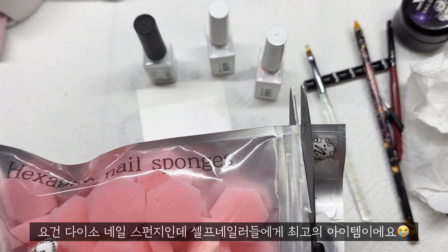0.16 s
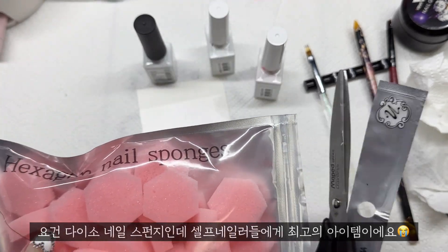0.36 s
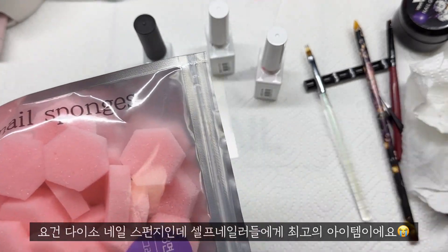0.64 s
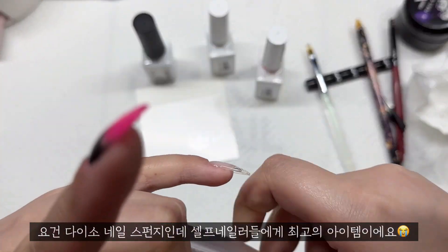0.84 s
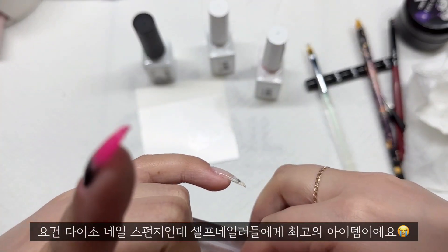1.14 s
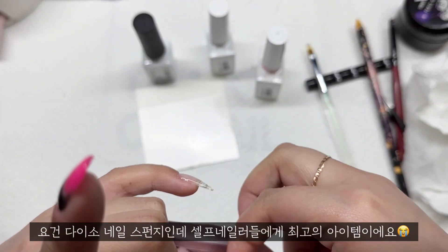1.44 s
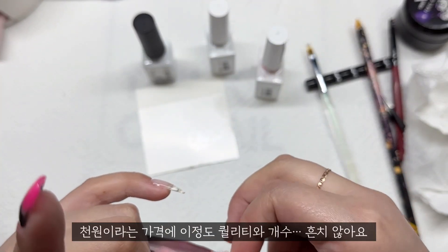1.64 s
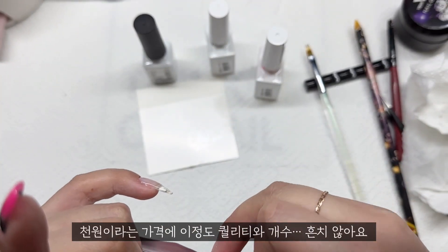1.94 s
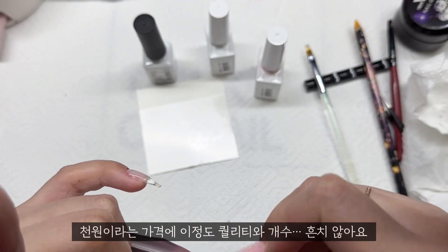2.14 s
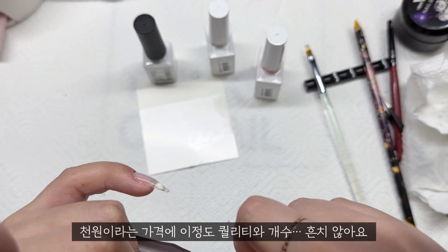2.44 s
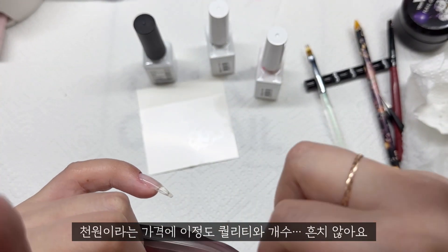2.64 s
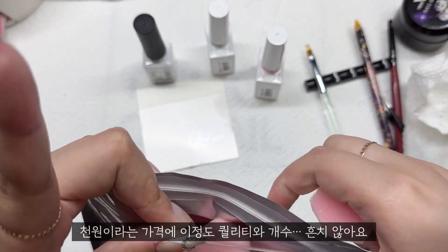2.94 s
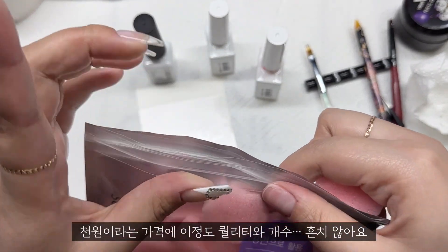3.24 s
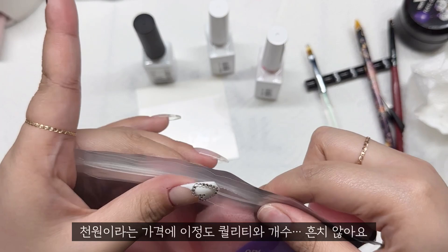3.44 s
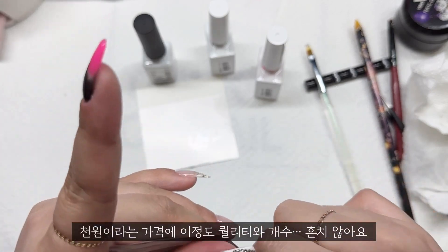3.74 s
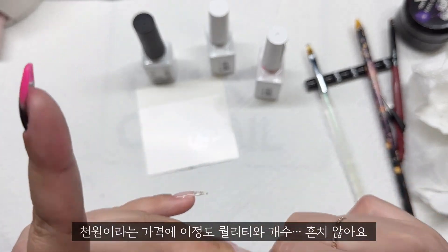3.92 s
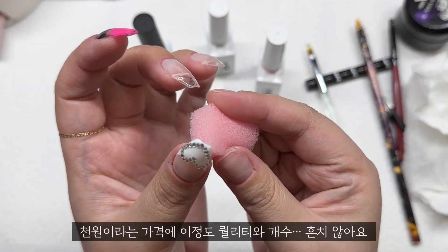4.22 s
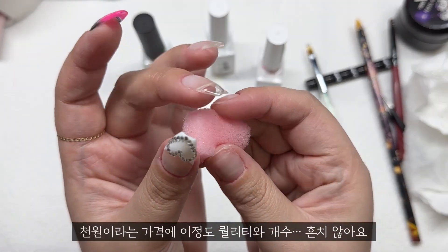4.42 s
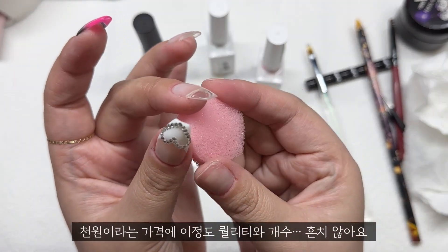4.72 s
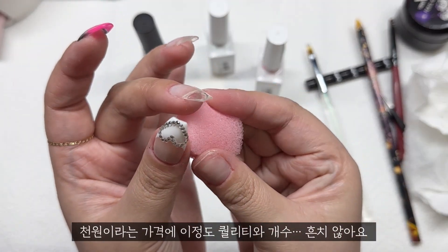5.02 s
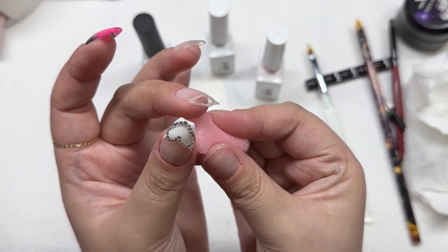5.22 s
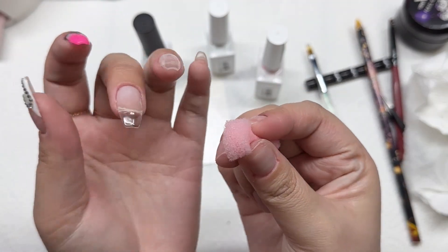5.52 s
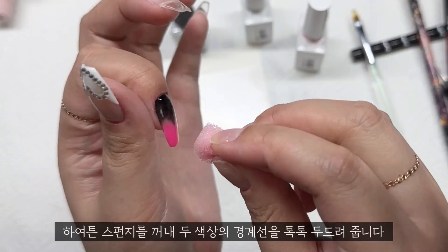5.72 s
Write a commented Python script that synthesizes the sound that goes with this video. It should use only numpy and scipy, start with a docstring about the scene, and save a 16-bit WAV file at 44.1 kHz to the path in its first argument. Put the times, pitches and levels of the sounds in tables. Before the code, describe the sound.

Close, crisp plastic packet: a quick metallic cut, rustling and hard buckling snaps, then sudden quiet with faint sponge fizz over hiss.

```python
"""Scissors snip the top off a plastic pouch of foam sponges, close up in a small quiet room: noise bursts, ringing.
Hands pull the pouch open and dig in it: film slides (friction grains), crackles, flops and buckles in sharp snaps.
The rustle stops dead; fingers faintly squeeze one sponge (fine grains) over microphone hiss (coloured noise)."""
import sys
import numpy as np
from scipy import signal
from scipy.fft import rfft, irfft, next_fast_len
from scipy.io import wavfile
from scipy.ndimage import uniform_filter1d

SR = 44100
rng = np.random.default_rng(int(sys.argv[2]) if len(sys.argv) > 2 else 0)


def put_to_file(sound):
    """Save the sound as 16-bit audio at rate SR, in the file named by the first command-line argument."""
    columns = np.atleast_2d(sound).T  # one column per channel
    safe = np.clip(columns, -1, 1)
    whole_steps = np.round(safe * 32767)
    wavfile.write(sys.argv[1], SR, whole_steps.astype(np.int16))


N = 258847
TIME = np.arange(N) / SR
GRIP_FROM_S = .56  # once picked up, the pouch never lies quite still
ARCH_DB = 2.5  # a movement presses hardest at its middle

# Spectrum of film rubbing at the contact. Each row: frequency in Hz, relative density in dB per Hz.
CONTACT_SPECTRUM = [(1200, -35.5), (2500, 0.5), (3200, 0.5), (4200, 2.5), (5000, -0.5), (7000, -0.5),
                    (8800, -1), (9800, -10), (11000, -23), (13000, -13.5), (16000, -16.5)]


def amp(db):
    """Decibels to gain."""
    return 10 ** (np.asarray(db) / 20)


def unit(x):
    """Scales to rms 1."""
    return x / np.sqrt(np.mean(x ** 2) + 1e-20)


def read(points, hz):
    """Reads a spectrum on a log-frequency axis."""
    f, value = np.transpose(points)
    return np.interp(np.log(hz + 1), np.log(f + 1), value)


def add(mix, s, sound):
    """Mixes a sound in at s seconds."""
    part = mix[max(round(s * SR), 0):][:len(sound)]
    part += sound[:len(part)]


def colour(x, spectrum, size=4096):
    """Causal minimum-phase filter with the given spectrum, so that clicks keep their sharp front."""
    hz = abs(np.fft.fftfreq(size, 1 / SR))
    log_gain = np.log(amp(read(spectrum, hz)))
    response = np.exp(np.conj(signal.hilbert(log_gain)))
    taps = np.fft.ifft(response).real[:size // 2]
    return signal.oaconvolve(x, taps)[:len(x)]


def band(x, lo_hz, hi_hz, order=2):
    """Band-pass."""
    edges_hz = [lo_hz, min(hi_hz, .49 * SR)]
    return signal.sosfilt(signal.butter(order, edges_hz, "band", fs=SR, output="sos"), x)


def resonate(x, hz, width_hz):
    """One resonance: a decaying complex pole."""
    r = np.exp(-np.pi * width_hz / SR)
    pole = r * np.exp(2j * np.pi * hz / SR)
    return 2 * signal.lfilter([1 - r], [1, -pole], x).real


def grains(per_s, spread_db, smooth, clump_db):
    """Tiny stick-slip releases of uneven size, coming in clumps, over smooth friction."""
    hits = rng.random(N) < per_s / SR
    signs = rng.choice([-1, 1], N)
    sizes = amp(spread_db * np.minimum(rng.exponential(1, N), 3.5))
    friction = unit(hits * signs * sizes) + smooth * rng.standard_normal(N)
    clumps = unit(uniform_filter1d(rng.standard_normal(N), size=220))  # 5 ms average
    return unit(friction * amp(clump_db * clumps))


def gesture(start_s, length_s, attack_s, release_s):
    """Envelope of one movement: it swells up to its start, arches over its length, and dies away."""
    early = np.maximum(start_s - TIME, 0) / attack_s
    late = np.maximum(TIME - start_s - length_s, 0) / release_s
    progress = np.clip((TIME - start_s) / (length_s + 1e-9), 0, 1)
    arch = 4 * progress * (1 - progress) - .5
    return np.exp(-early - late) * amp(ARCH_DB * arch)


def gestures(rows, attack_s, release_s):
    """Gain over time of movements (start in s, length in s, level in dB); their powers add."""
    power = np.zeros(N)
    for start_s, length_s, db in rows:
        power += (amp(db) * gesture(start_s, length_s, attack_s, release_s)) ** 2
    return np.sqrt(power)


def ticks(rows, decay_s):
    """Tiny dry noise ticks with no ring, from rows of time in s and level in dB."""
    out, t = np.zeros(N), np.arange(SR // 200) / SR
    for s, db in rows:
        add(out, s, amp(db) * unit(rng.standard_normal(len(t)) * np.exp(-t / decay_s)))
    return out


def background():
    """Microphone hiss and low room rumble, with a thin, fluttering electrical whine."""
    # Each row: frequency in Hz, relative density in dB per Hz.
    hiss_spectrum = [(25, -31), (45, -3.5), (70, 18.5), (100, 11.5), (300, 5.5), (1100, -3.5), (2000, 1),
                     (2900, -2), (4300, 3.5), (5200, -5), (7700, 3.5), (9000, -4), (11200, -30.5),
                     (16000, -17)]
    hiss = amp(-66.5) * unit(colour(rng.standard_normal(N), hiss_spectrum))
    flutter = 1 + .8 * np.cos(2 * np.pi * 60 * TIME)
    whine = amp(-75.5) * unit(band(rng.standard_normal(N), 5900, 5990) * flutter)
    return hiss + whine


def sliding():
    """Dense friction grains fizz at the contact; sparser slips and crinkles shake wider panels and crackle."""
    # Strokes of the film over blades, skin and itself.
    # Each row: start in seconds, length in seconds, panel rustle in relative dB, contact fizz in relative dB.
    strokes = np.array([(0.005, 0.01, -40.5, -49), (0.128, .02, -53, -63), (0.176, 0.0063, -35, -30.5),
                        (0.207, 0.023, -30, -29), (0.267, 0.05, -51.5, -48.5), (0.333, 0.28, -73, -67),
                        (0.597, 0.086, -85, -61), (0.65, 0.11, -70.5, -51.5), (0.789, 0.054, -44.5, -40.5),
                        (0.992, 0.066, -48, -41.5), (1.035, 0.048, -44.5, -35), (1.154, 0.058, -55.5, -45),
                        (1.23, 0.069, -52.5, -49.5), (1.38, 0.074, -55.5, -48), (1.49, 0.028, -52, -42.5),
                        (1.621, 0.033, -49.5, -41.5), (1.76, 0.01, -51.5, -62), (1.858, 0.0082, -48.5, -42),
                        (1.949, 0.08, -57.5, -45.5), (2.076, 0.066, -64, -55), (2.148, .02, -40.5, -66),
                        (2.365, 0.15, -62.5, -54.5), (2.517, 0.057, -45, -44), (2.59, 0.073, -52, -56),
                        (2.687, 0.0096, -41, -32.5), (2.708, 0.046, -55.5, -40),
                        (2.89, 0.031, -53.5, -45.5), (3.03, .018, -47, -69), (3.1, 0.064, -51, -39.5),
                        (3.17, 0.0062, -36, -32.5), (3.32, 0.075, -57.5, -59), (3.44, 0.013, -37.5, -40.5),
                        (3.484, 0.11, -46.5, -40.5), (3.67, 0.13, -52, -53.5), (3.781, 0.04, -41, -41),
                        (3.886, 0.056, -46.5, -36.5), (3.949, 0.005, -30, -29.5),
                        (3.995, 0.027, -38.5, -43)])
    # Resonances of the wider panels. Each row: frequency in Hz, width in Hz, linear gain.
    panel_modes = [(490, 160, 1.0), (1030, 92, 1), (1470, 340, 1.0)]
    # Spectrum of the shaking panels. Each row: frequency in Hz, relative density in dB per Hz.
    panel_spectrum = [(150, -9.5), (350, -5), (600, 1.5), (1000, -1), (1700, 3), (2800, -5.5),
                      (4000, -18.5), (8000, -43)]
    attack_s, release_s = .011, .012  # the film takes hold, and comes to rest
    grip_rustle_db, grip_fizz_db = -64, -59  # relative, as the strokes
    crinkle_share = .74  # single creases giving way amid the rustle

    held = TIME > GRIP_FROM_S
    flexing = np.hypot(gestures(strokes[:, [0, 1, 2]], attack_s, release_s), amp(grip_rustle_db) * held)
    contact = np.hypot(gestures(strokes[:, [0, 1, 3]], attack_s, release_s), amp(grip_fizz_db) * held)

    slips = grains(per_s=3500, spread_db=3.6, smooth=.7, clump_db=1.1)
    sparse = grains(per_s=700, spread_db=4, smooth=.45, clump_db=1.2)
    crinkles = crinkle_share * grains(per_s=110, spread_db=3, smooth=0, clump_db=0)
    kicks = slips + sparse + crinkles
    shaking = kicks + sum(gain * resonate(kicks, hz, width_hz) for hz, width_hz, gain in panel_modes)

    rustle = unit(colour(shaking, panel_spectrum)) * flexing
    fizz = unit(colour(slips, CONTACT_SPECTRUM)) * contact
    # The power above 1 makes the treble crackle grow faster than the level.
    crackle = unit(band(sparse + crinkles, 3000, 16000, order=1)) * contact ** 1.5
    return amp(-2.0) * rustle + amp(-5.5) * fizz + amp(0.5) * crackle


def snap(db, bass_db, treble_db, decay_s, ring_hz, ring_db, size=3072):
    """A sheet is jolted: bending waves arrive treble first, die treble first, and ring at a pitch."""
    # Spectrum of the film. Each row: frequency in Hz, relative density in dB per Hz.
    film_spectrum = [(40, -31.5), (100, -11.5), (250, -8), (500, -4.5), (1000, -4), (2000, 1), (3800, -2.5),
                     (5000, -6), (7500, -7), (9200, -13), (11000, -27), (16000, -25.5)]
    t = np.arange(size) / SR
    edges_hz = np.geomspace(70, 18000, 13)
    burst = np.zeros(size)
    for lo, hi in zip(edges_hz, edges_hz[1:]):
        slowness = 1500 / np.sqrt(lo * hi)
        rise = 1 - np.exp(-t / (0.00044 * slowness ** .6))
        fall = np.exp(-t / (1.2 * decay_s * slowness ** 0.083))
        burst += unit(band(rng.standard_normal(size) * rise * fall, lo, hi)) * np.sqrt(hi - lo)
    burst = unit(colour(burst, film_spectrum))
    burst = colour(burst, [(50, 0.5), (300, bass_db), (1000, 2.5), (3000, -1), (6500, treble_db)])

    ring = unit(resonate(burst, ring_hz, width_hz=120 + .1 * ring_hz))
    after_ring = unit(resonate(burst, ring_hz, width_hz=10 + 0.012 * ring_hz))
    burst += amp(ring_db) * (ring + amp(-12) * after_ring)
    # The level is that of the 700-5000 Hz energy spread over 3 ms.
    power = np.sum(band(burst, 700, 5000) ** 2) / (.003 * SR)
    return amp(db) * burst / np.sqrt(power)


def snips():
    """Blades bite through the film and clack shut; the scissors ring at the same pitch at every bite."""
    # Each row: time in seconds, level in dB, bass in dB, treble in dB, nominal decay in seconds, ring in dB.
    bites = [(0.0069, -40, 4.5, 0, 0.003, -16), (0.0142, -28, 10, 0, 0.0024, -5),
             (0.0386, -27, 3.5, -1.5, 0.004, -1.5), (0.0653, -31, 5, -16.5, 0.0015, -2.5),
             (0.0908, -41, 2.5, 14, .0013, -9.5), (0.1085, -37.5, 10.5, 9.5, .006, -10),
             (0.1384, -19, -9, -15, .0035, -7), (0.1608, -41.5, 3, 3.5, 0.0023, -8),
             (0.1632, -31, 11.5, -11.5, .0025, -13), (0.235, -8, -2, 0.5, 0.0018, -24.5),
             (0.2406, -17, 12.5, 3, .0024, -6), (0.2561, -20, -7.5, -11.5, .0015, -18.5)]
    blade_ring_hz = 1036
    out = np.zeros(N)
    for s, *shape, ring_db in bites:
        add(out, s, snap(*shape, blade_ring_hz, ring_db))
    return out


def handling():
    """Dull, low push of the hands on the pouch: noise with a soft low resonance."""
    # Shoves of the pouch. Each row: time in seconds, level in relative dB, release in seconds.
    shoves = [(0.045, -44, 0.027), (0.254, -28.5, 0.011), (0.965, -51, .04), (1.18, -52, 0.079),
              (1.78, -55.5, 0.057), (2.14, -52, .06), (2.53, -54, 0.087), (2.66, -50, 0.022),
              (3.155, -42.5, .022), (3.245, -55.5, 0.06), (3.545, -45, .02), (3.63, -39.5, .026),
              (3.765, -42, .055), (3.945, -40, 0.029), (4.0, -39.5, 0.0397)]
    # Each row: frequency in Hz, relative density in dB per Hz.
    hand_spectrum = [(25, -34), (45, -15), (70, 0.5), (140, -2), (200, -7.5), (330, -8.5), (600, -31),
                     (2000, -57)]
    resting_db, rise_s = -72, .022  # resting level relative, as the shoves
    push = rng.standard_normal(N)
    force = amp(resting_db) * (TIME > GRIP_FROM_S)
    for s, db, release_s in shoves:
        force = np.hypot(force, amp(db) * gesture(s, 0, rise_s, release_s))
    thud = unit(colour(push + 1.2 * resonate(push, 140, width_hz=18), hand_spectrum))
    return amp(-0.5) * force * thud


def creases():
    """Tiny creases tick in the film."""
    # Each row: time in seconds, level in relative dB.
    crease_ticks = [(0.114, -56), (0.126, -52), (0.4152, -55.5), (1.0809, -44.5), (2.456, -49.5),
                    (2.5757, -43), (2.787, -52), (3.2195, -44.5), (3.3334, -41), (3.385, -50),
                    (3.3996, -49.5), (3.5622, -46), (3.581, -40), (3.829, -45.5)]
    return amp(6.5) * colour(ticks(crease_ticks, decay_s=.0007), CONTACT_SPECTRUM)


def thumps():
    """Soft low thumps, the first from the scissors closing: each tone swells and dies within a few cycles."""
    # Each row: time in seconds, envelope peak in dB, pitch in Hz, decay in seconds.
    low_thumps = [(0.248, -34.5, 75, .012), (0.746, -49, 62, 0.014), (1.755, -44.5, 146, 0.023),
                  (3.945, -37.5, 105, 0.012), (4.55, -57, 72, 0.028)]
    out, t = np.zeros(N), np.arange(SR // 2) / SR
    for s, db, hz, decay_s in low_thumps:
        envelope = t / decay_s * np.exp(1 - t / decay_s)
        add(out, s, amp(db) * envelope * np.sin(2 * np.pi * hz * t))
    return out


def pops():
    """A bulging panel pops hollowly, each time with a pitch of its own."""
    # Each row: time in seconds, level in dB, treble in dB, nominal decay in seconds, ring in Hz, ring in dB.
    bulges = [(0.3837, -48.5, -4, .005, 988, 2), (0.749, -36.5, -24, 0.0044, 1540, 6.5),
              (1.2321, -23.5, 0.5, 0.0024, 1360, 9), (1.3487, -28.5, -30, 0.003, 587, -5.5),
              (2.0035, -35.5, -20.5, .009, 1440, 8), (2.5948, -24, -10, 0.0036, 1486, -5),
              (3.0555, -34, 13, .0017, 1090, 7), (3.239, -23, -9, 0.0023, 1020, 22),
              (3.6468, -23.5, -9, 0.0017, 1940, 27), (3.7067, -39.5, -15, 0.0028, 1294, 1)]
    bass_db = 4.5
    out = np.zeros(N)
    for s, db, *shape in bulges:
        add(out, s, snap(db, bass_db, *shape))
    return out


def panel_snaps():
    """Taut panels buckle; a brighter snap comes from a smaller panel and rings higher, faintly."""
    # Each row: time in seconds, level in dB, bass in dB, treble in dB, nominal decay in seconds.
    buckles = [(0.551, -43.5, -6, 9, .0028), (0.6981, -37.5, -11.5, 8, .0096),
               (0.9339, -22, -11, -4, .0017), (0.9381, -21.5, -4.5, -14, .0012),
               (0.9509, -8.5, -15, 3.5, 0.0016), (1.0361, -24, -3, 1, .0087),
               (1.0495, -33.5, -1, 25, .0013), (1.109, -36, 2, 1.5, .01), (1.388, -42.5, -16, 6, .0033),
               (1.6368, -28, -29, -40, .003), (1.748, -39.5, 11, 7.5, .0021), (2.0281, -37, 5, 8.5, .0069),
               (2.0504, -38.5, 13, 6.5, .0036), (2.1318, -12, -3, -1, 0.00062),
               (2.1371, -19, 0, -25, .0007), (2.5015, -30, 8, -1.5, .008), (2.6235, -27, -23, -1, .0037),
               (2.6258, -25, -12, 10, .0056), (2.8902, -39.5, 11, -11, .0026), (2.9594, -33, -13, 4, .0071),
               (2.9622, -30, -13, -0.5, .0083), (3.0133, -26.5, 4.5, -16, .0033),
               (3.0366, -34.5, 17, 6, .0047), (3.1309, -38, -4, 17, .0006),
               (3.1388, -21.5, 12.5, 5.5, .0019), (3.2403, -38.5, 13, 16, .0028),
               (3.4236, -36, 13, -15, .0017), (3.4362, -36.5, 5.5, -10, .0039),
               (3.4466, -26, 7.5, 0, .0034), (3.5316, -17, 2, -0.5, .0039), (3.6155, -25.5, 3, -9.5, .0014),
               (3.6257, -9.5, -3, 4.5, .0025), (3.747, -14, -10, -4, .0012), (3.7493, -9, -1.5, 7.5, .0017),
               (3.7616, -11, -19, 13, 0.0011), (3.7783, -14.5, -16, -9.5, .002),
               (3.8793, -34.5, 5.5, -20, .0024), (3.889, -25, 7, -3, .0013), (3.94, -24.5, 18, 13, .0085),
               (3.9872, -8, -6.5, 1, 0.0019), (4.0016, -20.5, 5.5, -17.5, .002)]
    neutral_ring_hz, ring_db, treble_db_per_octave = 3030, -15, 16  # pitch at 0 dB treble
    out = np.zeros(N)
    for s, db, bass_db, treble_db, decay_s in buckles:
        pitch_hz = neutral_ring_hz * 2 ** (treble_db / treble_db_per_octave)
        add(out, s, snap(db, bass_db, treble_db, decay_s, pitch_hz, ring_db))
    return out


def flops():
    """Slack folds of the pouch flop over, each giving one rounded push and pull."""
    # Each row: time in seconds, nominal level in dB, pitch in Hz.
    folds = [(0.929, -29.5, 302), (1.004, -40, 150), (1.159, -45, 231), (1.232, -35, 313),
             (1.434, -42.5, 165), (1.515, -44, 158), (1.747, -36, 150), (2.053, -37, 139),
             (2.142, -40.5, 140), (2.5, -31.5, 273), (2.634, -36, 112), (2.89, -38.5, 160),
             (3.037, -33, 253), (3.061, -35.5, 170), (3.104, -26, 330), (3.137, -32.5, 200),
             (3.203, -39, 260), (3.235, -25.5, 310), (3.502, -23, 460), (3.535, -29, 188)]
    out, t = np.zeros(N), np.arange(SR // 10) / SR
    for s, db, hz in folds:
        cycles = hz * t
        envelope = cycles / 0.52 * np.exp(1 - cycles / 0.34)
        add(out, s, amp(db) * envelope * np.sin(2 * np.pi * cycles))
    return out


def sponge():
    """Squeezed foam cells fizz finely, with a few ticks where a nail catches and slips."""
    # Each row: start in seconds, length in seconds, level in relative dB.
    squeezes = [(4.075, .025, -68.5), (4.405, .04, -64), (4.56, .08, -69), (4.65, .12, -66),
                (5.0, 0.064, -76), (5.23, .08, -73), (5.7, .04, -73)]
    # Nail on the foam. Each row: time in seconds, level in relative dB.
    catches = [(4.529, -65), (4.663, -57.5), (4.705, -60), (4.721, -59.5), (4.748, -53.5), (4.819, -61)]
    # Each row: frequency in Hz, relative density in dB per Hz.
    foam_spectrum = [(300, -21), (1500, -8.5), (4000, -2), (7500, 1.5), (9500, -2), (11500, -18),
                     (16000, -19.5)]
    pressure = gestures(squeezes, attack_s=.025, release_s=.045)
    cells = pressure * grains(per_s=4000, spread_db=4, smooth=.9, clump_db=2.0)
    nail = band(ticks(catches, decay_s=0.0018), 5170, 15000)
    return amp(5.0) * colour(cells, foam_spectrum) + amp(3.5) * colour(nail, foam_spectrum)


def disperse(x, delay_s, knee_hz):
    """Low bending waves cross the film slowly, so every impulse falls in pitch."""
    size = next_fast_len(N + SR // 4)
    hz = np.fft.rfftfreq(size, 1 / SR)
    lag_s = delay_s / (1 + (hz / knee_hz) ** 1.5)
    phase = 2 * np.pi * np.cumsum(lag_s) * hz[1]  # group delay integrated over frequency
    return irfft(rfft(x, size) * np.exp(-1j * phase), size)[:N]


def room(x, near_db, near_t60_s, far_db):
    """Quick scatter from desk and hands, then the short tail of the room, which booms at one low mode."""
    # Decay of the tail. Each row: frequency in Hz, T60 in seconds.
    tail_t60 = [(140, 0.25), (500, 0.19), (1400, 0.13), (3700, 0.13), (9700, 0.17)]
    t = np.arange(SR // 2) / SR
    taps = rng.choice([-1., 1.], len(t)) * (rng.random(len(t)) < 5000 / SR)
    near = taps * (t > .003) * amp(-60 * t / near_t60_s)

    hz, at_s, z = signal.stft(rng.standard_normal(len(t)), SR, nperseg=256)
    fading = z * amp(-60 * at_s / read(tail_t60, hz)[:, None])
    far = signal.istft(fading, SR, nperseg=256)[1][:len(t)] * (t > .008)
    far += 3 * resonate(far, 130, width_hz=14)

    response = amp(near_db) * near / np.linalg.norm(near) + amp(far_db) * far / np.linalg.norm(far)
    return x + signal.fftconvolve(x, response)[:N]


def scene():
    """Scissors and pouch until the sudden stop, then only sponge and a soft thump over the background."""
    stop_s = 4.018
    taut = disperse(snips() + pops() + panel_snaps(), delay_s=0.0082, knee_hz=152)
    slack = disperse(flops(), delay_s=.018, knee_hz=211)
    film = taut + slack + creases() + sliding()
    pouch = room(film, near_db=-14.0, near_t60_s=0.081, far_db=-15.5) + amp(2) * handling()
    audible = np.clip((stop_s - TIME) / .002, 0, 1)  # cuts the room tail too
    return (pouch * audible + thumps() + sponge() + background())[None]


def record(dry):
    """A rumble filter; the input overloads at full scale; then the band limit."""
    lean = signal.sosfilt(signal.butter(3, 40, "high", fs=SR, output="sos"), dry)
    clipped = np.clip(lean, -1, 1)
    low_pass = signal.firwin(255, cutoff=16000, window=("kaiser", 7), fs=SR)
    return signal.oaconvolve(clipped, low_pass[None], "same")


dry = scene()
out = record(dry)
put_to_file(out)
```